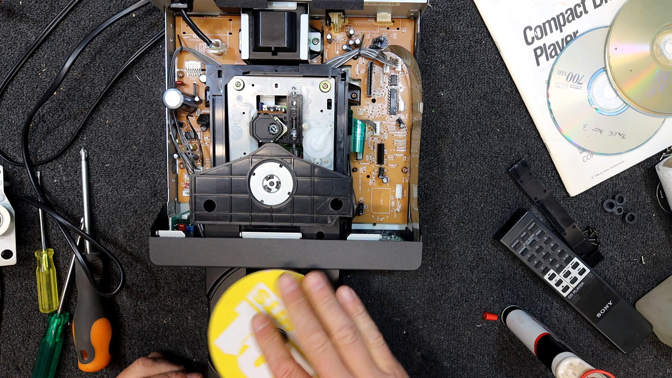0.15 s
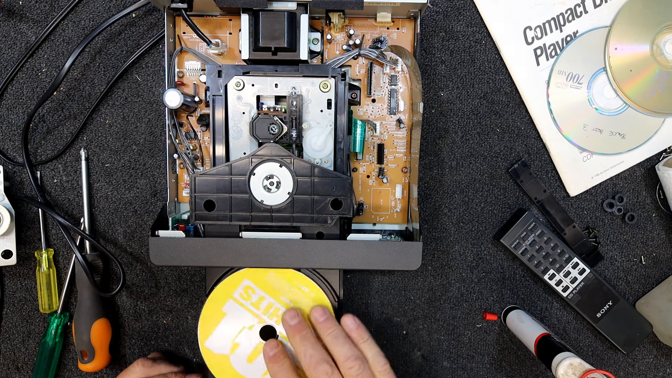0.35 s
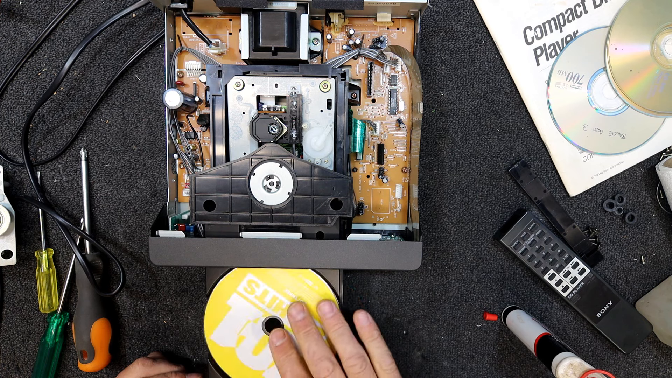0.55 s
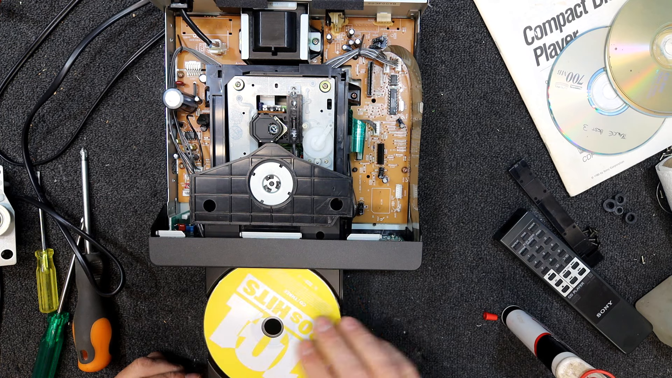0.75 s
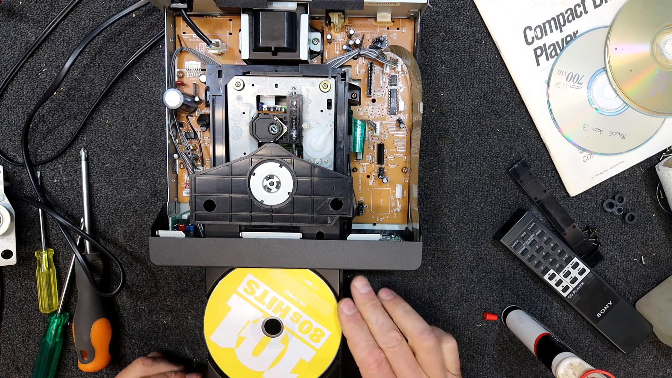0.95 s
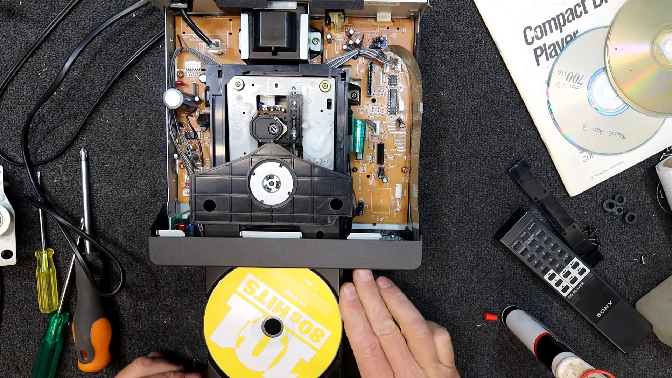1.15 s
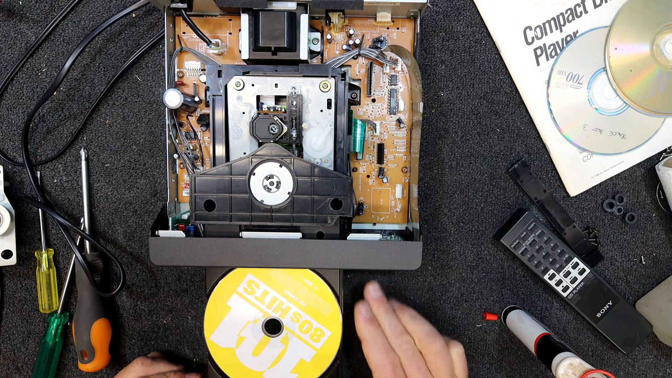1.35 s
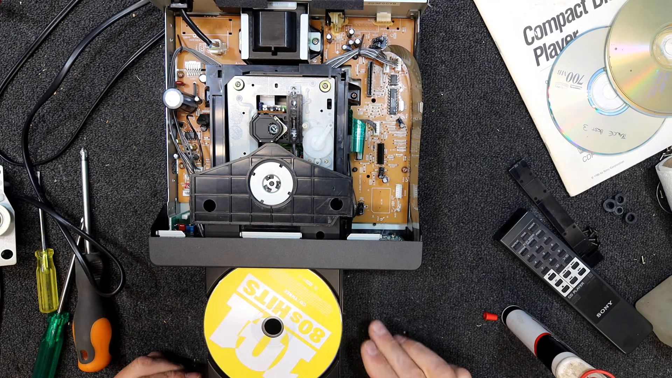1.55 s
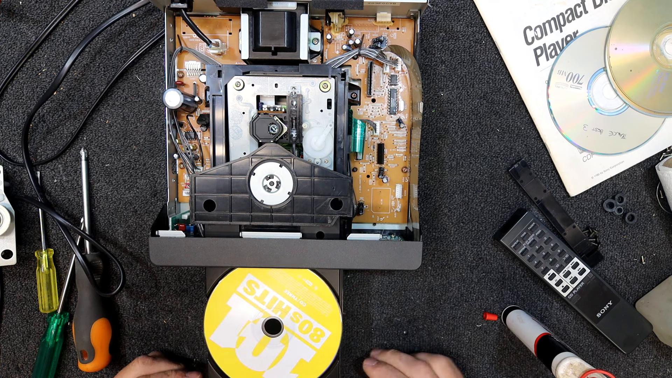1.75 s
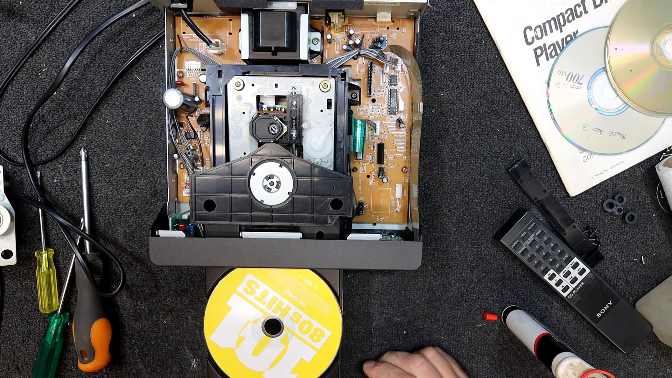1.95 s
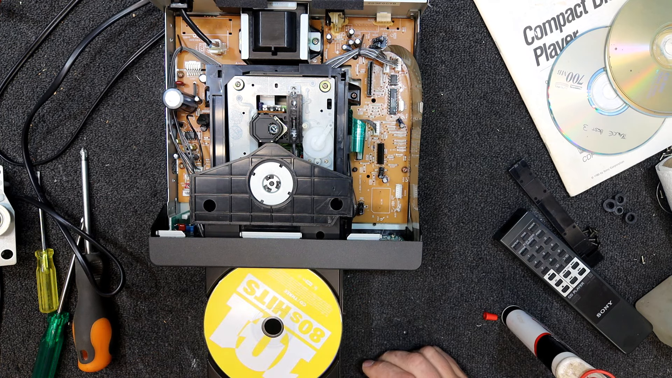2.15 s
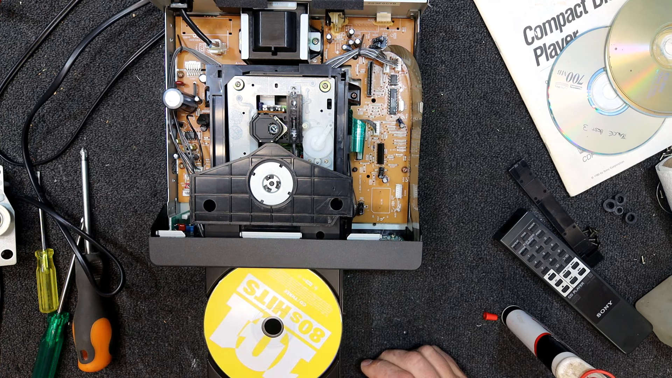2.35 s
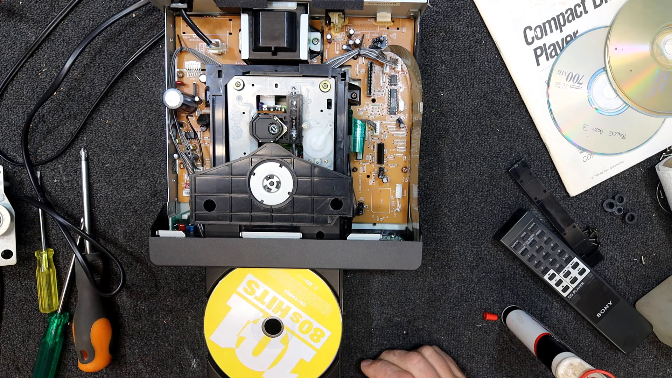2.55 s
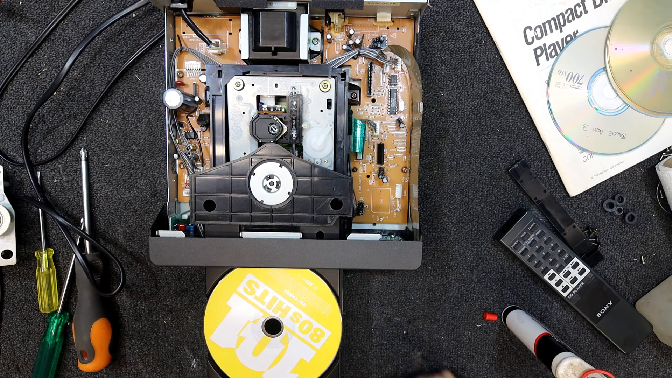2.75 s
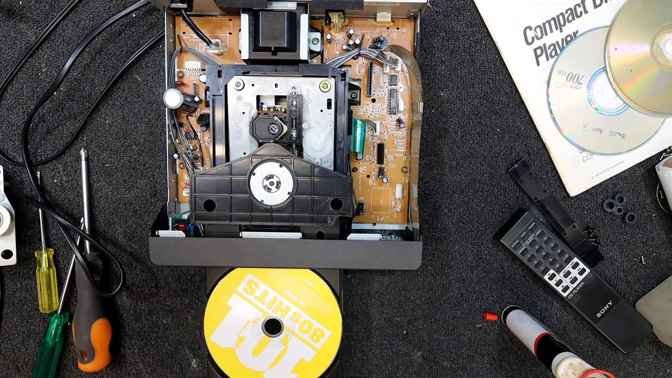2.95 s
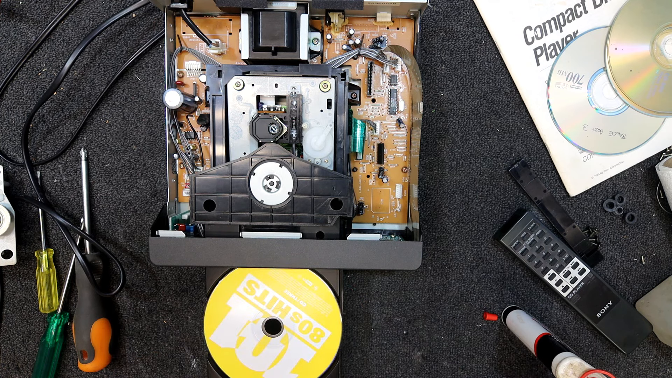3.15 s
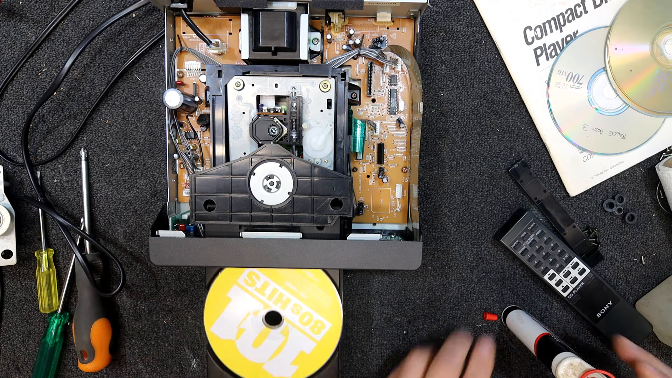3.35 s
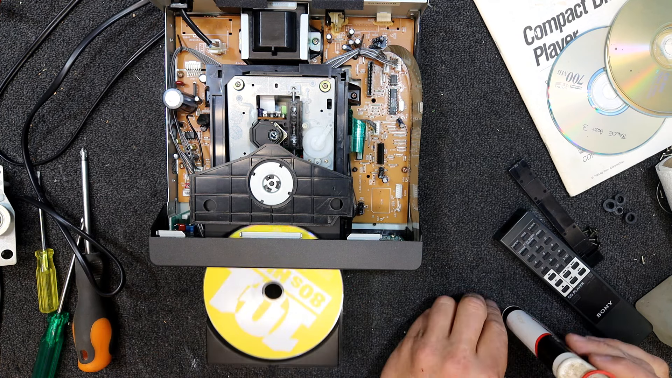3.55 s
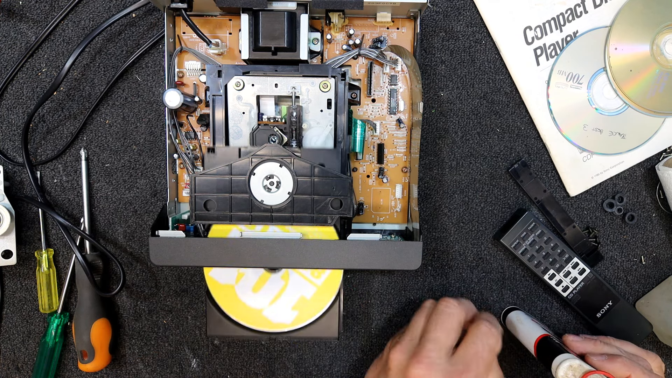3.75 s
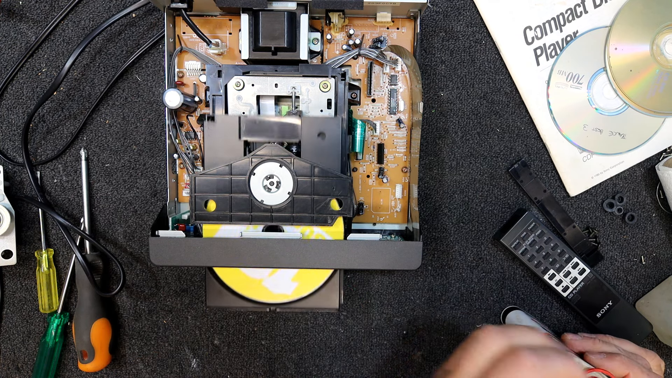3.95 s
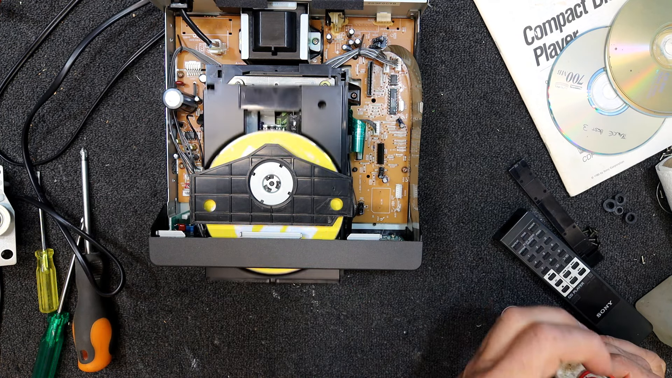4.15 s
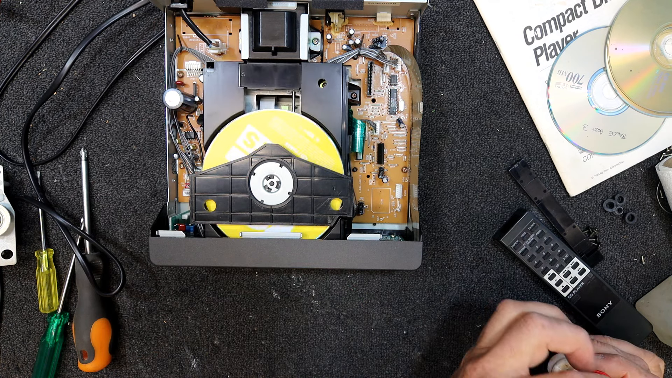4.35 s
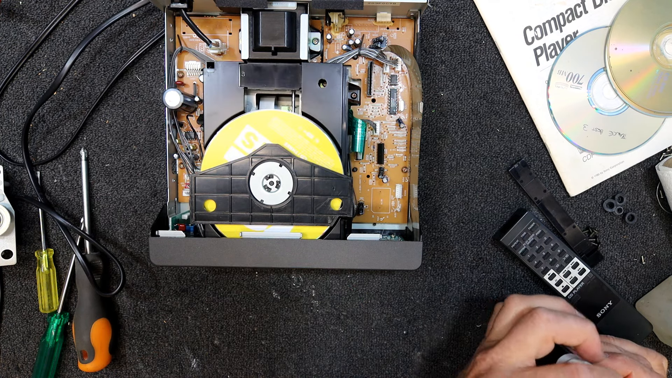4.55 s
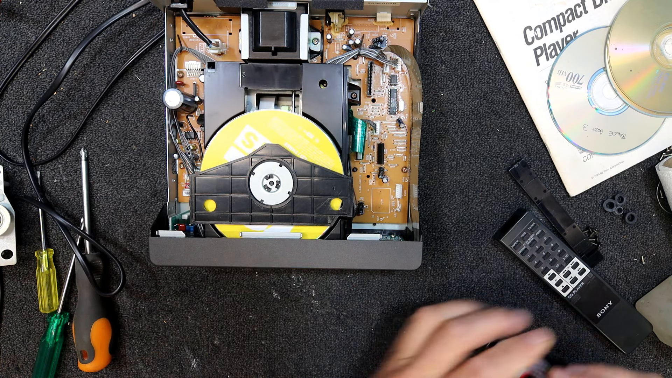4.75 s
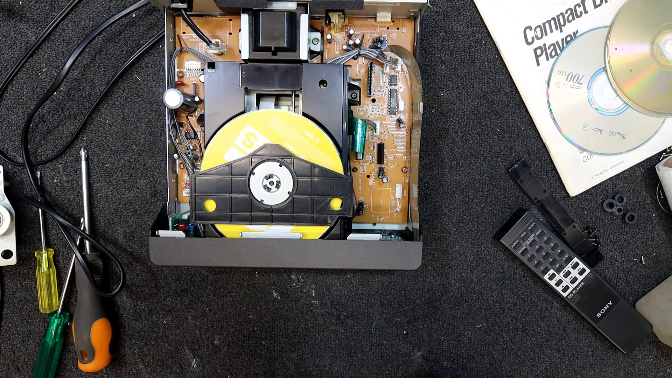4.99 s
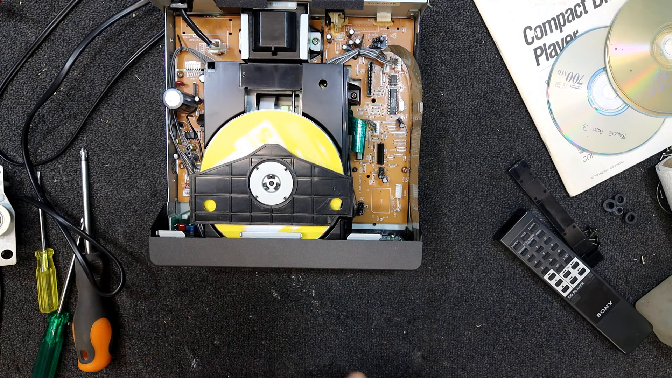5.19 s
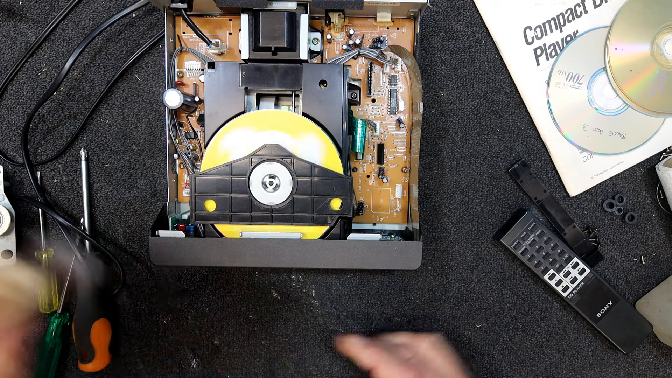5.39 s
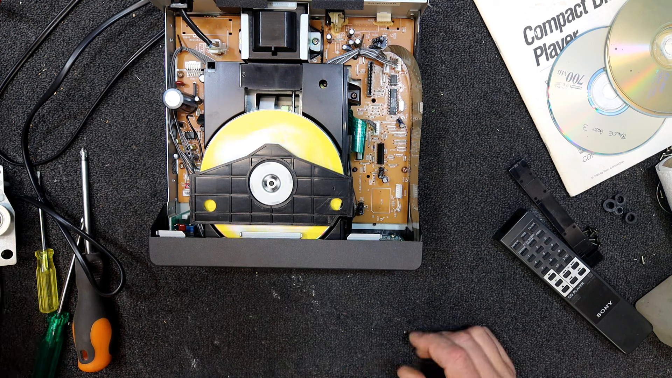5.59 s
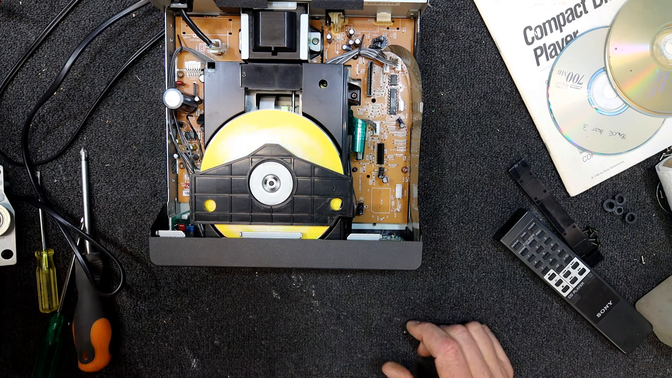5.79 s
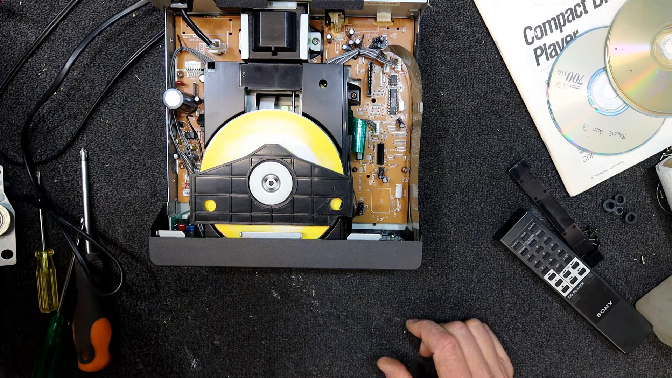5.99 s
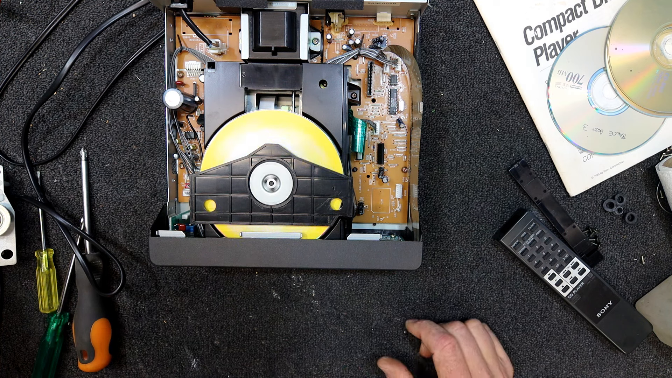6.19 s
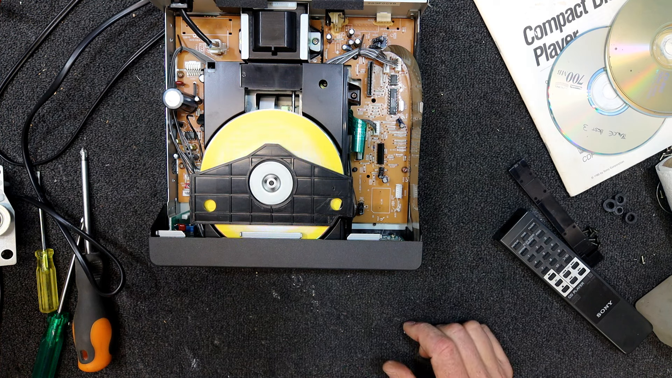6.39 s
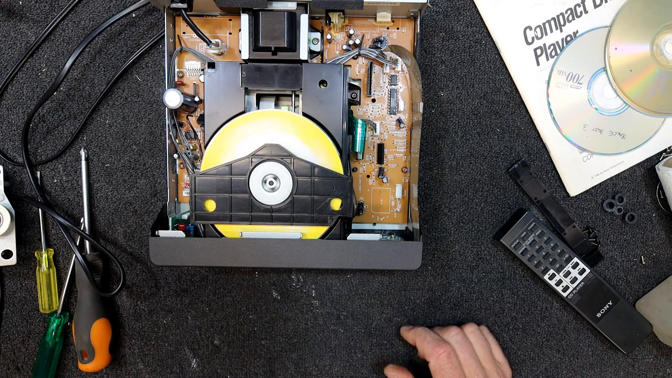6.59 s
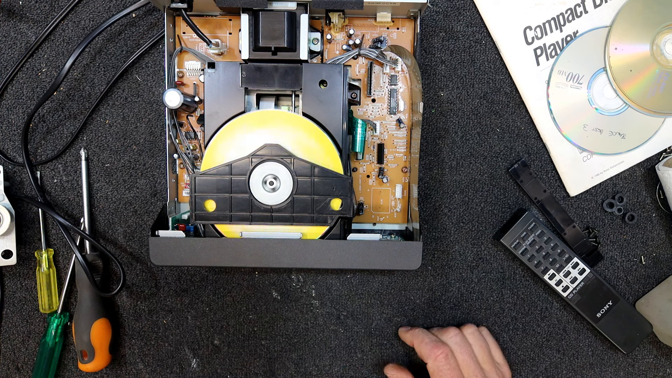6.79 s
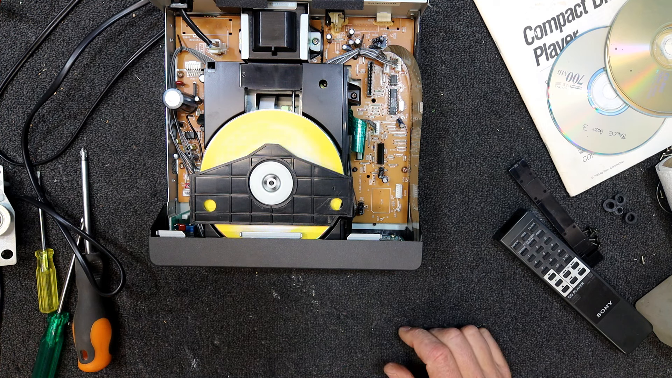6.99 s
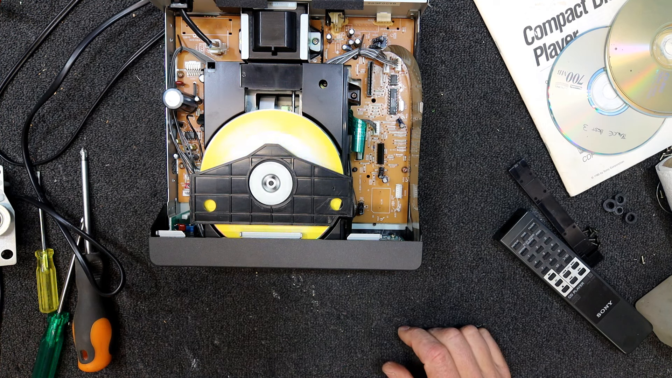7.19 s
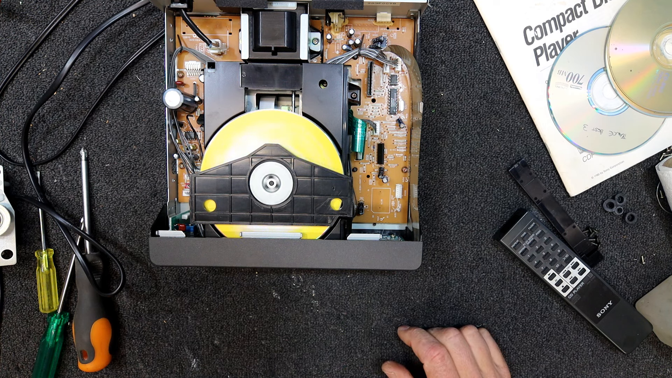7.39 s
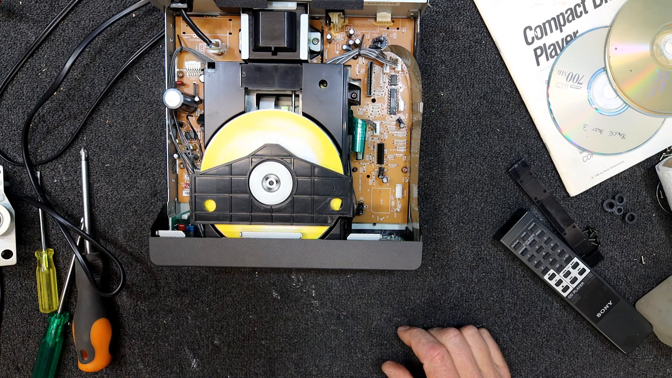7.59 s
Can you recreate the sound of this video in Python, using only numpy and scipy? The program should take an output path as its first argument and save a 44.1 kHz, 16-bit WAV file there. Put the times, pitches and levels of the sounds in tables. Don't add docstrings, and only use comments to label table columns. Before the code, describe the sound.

Over low mains hum and faint fan, a light disc rattles and scrapes on plastic, ringing briefly, and snaps home. Hands touch, slap and brush the bench. The tray motor clicks on, buzzes unevenly inward, and the clamp cracks shut with ratcheting clicks. Very quiet high squeaks and fluttering hiss come next, then one heavy, dull knock and soft ticking. Close, dry microphone above the bench.

```python
import sys
import numpy as np
from scipy import signal
from scipy.fft import rfft, irfft
from scipy.io import wavfile
from scipy.ndimage import uniform_filter1d, minimum_filter1d, map_coordinates

SR = 44100
rng = np.random.default_rng(int(sys.argv[2]) if len(sys.argv) > 2 else 0)


def gain_from_db(level_db):
    decades = np.asarray(level_db, float) / 20
    return 10 ** decades


def wav_record(signal):
    frames = np.transpose(np.atleast_2d(signal))
    bounded = np.clip(frames, -1, 1)
    quanta = np.round(bounded * 32767).astype(np.int16)
    wavfile.write(sys.argv[1], SR, quanta)


N = 336924
T = np.arange(N) / SR

# frequency in Hz, width in Hz, level in dB.
CHASSIS = [(443, 55, -3), (694, 88, 9), (1010, 140, 13.5), (1950, 93, -1), (2815, 200, 2), (3570, 61, 4.5),
           (3800, 60, -11), (5370, 280, -4), (8400, 150, -32)]
# frequency in Hz, density in dB per Hz.
CHASSIS_TONE = [(60, -35), (130, 9), (300, -1.5), (600, -10.5), (1000, -7), (1830, -10.5), (3250, -6.5),
                (6000, -16.5), (16000, -24)]
TRAY_TONE = [(120, -45), (200, -1), (519, -16.5), (722, 5), (867, -1.5), (1060, 3), (2090, -5), (2650, -2),
             (16000, -23)]
LENS_TONE = [(600, -9), (1500, -5.5), (3000, -1.5), (6000, -8), (10000, 2), (12500, -10), (14500, -17),
             (16000, -20)]


def disc():
    # start in seconds, peak in dB, low band in dB relative, high band in dB relative.
    disc_hits = [(0.2399, -18, -8, -3), (0.2678, -32.5, 8.5, -7), (0.3047, -19, -6, -0.5),
                 (0.3247, -23, -4, -12), (0.3436, -7.5, -11, -13), (0.3574, -8.5, -19, 1),
                 (0.3965, -11.5, -5, -1), (0.4194, -12.5, -17, -23), (0.4314, -10.5, 0, 5.5),
                 (0.4464, -8, -12, -12), (0.4648, -9.5, -12, -8), (0.5447, -31, 0, -19),
                 (0.5614, -36.5, 12.5, -21), (.6539, -16, -12, -3), (.6664, -7, -6.5, -3.5),
                 (0.7696, -34.5, 6, -31), (0.8225, -35, 2.5, -24), (0.8584, -52, 12.5, -18.5),
                 (1.3205, -48, -12, 9), (1.3934, -40, 13.5, -4), (1.5309, -46, 9.5, -33)]
    # frequency in Hz, width in Hz, level in dB.
    disc_modes = [(894, 26, 16.5), (1927, 46, -10.5), (2620, 240, -6.5), (3000, 37, -15.5),
                  (3265, 19, -7.5), (3710, 89, -11.5), (4450, 260, -20.5), (5160, 30, -20),
                  (6170, 180, -22.5), (6960, 56, -31), (8100, 110, -29)]
    # frequency in Hz, density in dB per Hz.
    disc_tone = [(100, -22), (400, -20), (600, -17.5), (1000, -3), (1600, -17.5), (2700, -17), (7000, -23),
                 (16000, -38)]
    # middle in seconds, half length in seconds, level in dB.
    scrapes = [
        (.28, 0.033, -39),
        (.329, 0.0041, -22),
        (.35, 0.02, -17),
        (.396, .006, -16),
        (.445, 0.052, -17.5),
        (.57, 0.029, -48),
        (.625, 0.015, -40),
        (.668, 0.018, -18.5),
        (.78, 0.02, -45),
    ]
    # start in seconds, level in dB.
    bends = [
        (.305, -28),
        (.3445, -11),
        (.36, -6.5),
        (.391, -10),
        (.424, -20),
    ]
    # start in seconds, frequency in Hz, level in dB, T60 in seconds.
    bell_tones = [(.344, 2850, -9, 0.04), (.358, 2355, -5, 0.053), (.42, 2900, -13, .04),
                  (.465, 2710, -8.5, 0.044), (.328, 980, -19, .06), (.445, 1000, -13, 0.057),
                  (.452, 1202, -21, 0.16), (.671, 1015, -12.5, 0.05), (1.276, 1040, -18, 0.038),
                  (1.531, 1530, -31, 0.034), (1.532, 2160, -38, .04), (1.532, 1850, -34, 0.032)]
    response = body(disc_tone, disc_modes[1:], lift_db=11, damping=.03)
    rattle = strikes(disc_hits, response, trim_db=0, rise=.00025, t60=.05)
    slide = strokes(scrapes) * through(grit(spread_db=3), response)
    bend_hz, bend_t60 = 894, .2
    bending = rings([(s, bend_hz, db, bend_t60) for s, db in bends])
    return rattle + slide + bending + rings(bell_tones, rough=1.5)


def snaps():
    # start in seconds, peak in dB, low band in dB relative, high band in dB relative.
    seat_hits = [
        (1.2712, -6, -24, -12),
        (1.2725, -11, -11.5, -22),
        (4.5742, -5.5, -9, -10),
    ]
    # frequency in Hz, width in Hz, level in dB.
    seat_modes = [(1040, 100, 3.5), (1870, 36, -4), (2030, 15, -16), (2260, 35, -23), (3090, 52, -11),
                  (3800, 47, -4), (4220, 42, -7), (5000, 27, -12), (5910, 40, -20), (9500, 130, -25)]
    # frequency in Hz, density in dB per Hz.
    seat_tone = [(180, -55), (300, -21), (634, -20), (1060, 0), (1430, -14), (3080, -12), (5080, -17),
                 (16000, -48.5)]
    # middle in seconds, half length in seconds, level in dB.
    rumbles = [
        (4.55, 0.014, -32.5),
        (4.6, 0.022, -28.5),
        (4.635, .012, -35),
        (4.67, .012, -40),
        (3.46, .02, -46),
    ]
    # frequency in Hz, density in dB per Hz.
    rumble_tone = [(60, -42), (130, -5.5), (200, 1), (400, -6), (700, -9), (1200, -16), (16000, -80)]
    # middle in seconds, half length in seconds, level in dB.
    holds = [
        (5.285, .012, -50),
        (5.365, .014, -57),
        (5.415, .015, -50),
        (5.465, .018, -53),
        (5.55, .035, -63),
        (5.62, .015, -68),
        (6.4, .8, -74),
    ]
    # frequency in Hz, width in Hz, level in dB.
    holder_mode = [(10270, 300, 0)]
    # start in seconds, frequency in Hz, level in dB, T60 in seconds.
    chirps = [(5.27, 3000, -39, .03), (5.325, 4430, -41, .06), (5.338, 4620, -39, .05),
              (5.352, 5600, -45, .04), (5.36, 5840, -38, .05), (5.362, 4500, -42, .05),
              (5.39, 7900, -52, .04), (5.43, 5800, -47, .04), (5.32, 3450, -46, .06)]
    seat = body(seat_tone, seat_modes, lift_db=4, damping=.05)
    clamp_body = body(CHASSIS_TONE, seat_modes, lift_db=-3, damping=.1)
    crack = strikes(seat_hits[:1], seat, trim_db=.5, rise=.00026, t60=.013)
    chatter = strikes(seat_hits[1:2], seat, trim_db=.9, rise=.00053, t60=.063)
    clamp = strikes(seat_hits[2:], clamp_body, trim_db=.1, rise=.0004, t60=.008)
    shudder_body = body(rumble_tone, CHASSIS[:1], lift_db=-10)
    shudder = strokes(rumbles) * through(grit(spread_db=2), shudder_body)
    holder = strokes(holds) * through(rng.standard_normal(N), body(LENS_TONE, holder_mode, lift_db=34))
    return crack + chatter + clamp + shudder + holder + rings(chirps, rough=2.5)


def mechanism():
    # time in seconds, level in dB.
    motor_load = [
        (3.4, -44.5),
        (3.59, -40.5),
        (3.95, -42),
        (4.3, -41.5),
        (4.6, -35.5),
        (4.76, -40),
        (4.89, -44),
        (4.96, -81),
    ]
    # frequency in Hz, width in Hz, level in dB.
    tray_modes = [(720, 45, -24), (1120, 160, -11), (1820, 75, -2), (2680, 70, -2), (3560, 54, -4),
                  (5140, 54, -16), (6230, 41, -31), (6430, 46, -32), (8060, 23, -17), (13500, 69, -20.5)]
    loader_modes = [(687, 27, 2), (1075, 140, 2), (1830, 36, -9), (3480, 210, -7), (3770, 71, -7.5),
                    (4500, 73, -9.5), (5040, 120, -6), (6860, 20, -24), (8080, 54, -9), (8660, 36, -23),
                    (9500, 240, -12), (11100, 110, -16)]
    # frequency in Hz, density in dB per Hz.
    loader_tone = [(120, -40), (200, -8), (456, -25), (529, -33), (683, -8), (867, -15), (1060, -9.5),
                   (3620, -8.5), (16000, -26.5)]
    # middle in seconds, half length in seconds, level in dB.
    latch = (4.902, 0.017, -42.5)
    # middle in seconds, half length in seconds, level in dB.
    slack = [
        (3.42, 0.0028, -35),
        (3.46, 0.021, -23.5),
        (3.5, 0.013, -28.5),
        (4.62, 0.012, -58),
        (4.675, 0.0058, -38),
        (4.92, 0.0043, -36),
    ]
    # start in seconds, peak in dB, low band in dB relative, high band in dB relative.
    gear_hits = [
        (3.4156, -31, -17, -4),
        (3.4391, -12.5, -13.5, -14),
        (4.4369, -17, -7.5, -25),
        (4.5765, -16, -13, -6),
        (4.8303, -16, -16, -16),
        (4.8511, -16, -12.5, -27),
    ]
    # start in seconds, peak in dB.
    cam_ticks = [(3.4522, -28), (3.471, -30), (3.492, -29), (4.467, -26), (4.485, -31), (4.5154, -26),
                 (4.537, -30), (4.554, -24), (4.6103, -34), (4.628, -22), (4.6629, -21.5), (4.6741, -27),
                 (4.697, -36), (4.7166, -30), (4.744, -32), (4.76, -30), (4.7849, -29), (4.811, -25.5),
                 (4.9152, -30)]
    # start in seconds, frequency in Hz, level in dB, T60 in seconds.
    clamp_tones = [(4.664, 665, -29, 0.066), (4.672, 687, -24, 0.056), (4.5745, 2810, -3.5, 0.013),
                   (4.617, 1100, -22, 0.049), (4.155, 1070, -32, 0.089), (4.18, 1040, -28.5, 0.066),
                   (4, 1080, -33, 0.065), (4.5745, 1830, -3.5, 0.013), (4.5745, 2280, -10, 0.011),
                   (4.58, 184, -16, 0.067), (4.576, 432, -13, 0.04)]
    cog_rate, cog_start, cog_db = 15.55, 3.578, -6
    loader_on_s, loader_off_s, loader_db = 4.11, 4.45, -38
    cam_low_db, cam_high_db = -8.5, -24

    turn = cog_rate * (T - cog_start) % 1
    cog_body = body(TRAY_TONE, [(1120, 190, -1), (1850, 340, -3)], lift_db=21)
    cog = through(grit(spread_db=.5) * np.exp(-turn / .091), cog_body)
    drive = through(grit(spread_db=1.5), body(TRAY_TONE, tray_modes, lift_db=1, damping=.04))
    rub = through(grit(spread_db=1.5), body(loader_tone, loader_modes, lift_db=9, damping=.015))
    loading = ramp(loader_on_s, .013)
    running = T < loader_off_s
    load = level(motor_load)
    pull = load * ((1 - loading) * drive + gain_from_db(cog_db) * cog * running)
    rub_level = gain_from_db(loader_db) * loading * running + strokes([latch])
    whirr = patchy(pull + rub_level * rub, depth_db=1.5)
    mesh = gain_from_db(1.1 * wobble(45))
    cam_level = load * ~running + strokes(slack)
    cams = cam_level * through(grit(spread_db=2.5), body(TRAY_TONE, CHASSIS, lift_db=8, damping=.04))
    hits = gear_hits + [(s, db, cam_low_db, cam_high_db) for s, db in cam_ticks]
    chassis = body(CHASSIS_TONE, CHASSIS, lift_db=8, damping=.04)
    clicks = strikes(hits, chassis, trim_db=1.75, rise=.0005, t60=.031)
    return mesh * whirr + cams + rings(clamp_tones) + clicks


def pickup():
    # frequency in Hz, width in Hz, level in dB.
    lens_modes = [(3580, 27, -0.5), (3900, 13, -32), (4560, 360, 2.5), (5800, 180, 1), (6250, 49, -7),
                  (6640, 120, -5), (8240, 29, -12), (10270, 200, 1.5)]
    # start in seconds, end in seconds, start in Hz, end in Hz, level in dB.
    sweeps = [
        (5.262, 5.298, 1480, 10760, -51),
        (5.302, 5.345, 8600, 12900, -49),
        (5.377, 5.415, 7500, 8950, -55),
        (5.405, 5.465, 9400, 12000, -52),
        (5.503, 5.589, 8330, 10630, -65),
        (5.645, 5.68, 13300, 13900, -49),
        (5.66, 5.7, 14100, 14700, -45),
        (5.76, 5.874, 9500, 11100, -79),
        (5.98, 6.05, 13500, 14500, -59),
    ]
    # middle in seconds, half length in seconds, level in dB.
    grabs = [
        (5.272, 0.0028, -42),
        (5.287, 0.01, -40.5),
        (5.33, 0.042, -47.5),
        (5.44, 0.012, -48),
    ]
    seeks = [7.2416, 7.2766, 7.3258, 7.3615, 7.3876, 7.443, 7.4681, 7.5082, 7.538, 7.583, 7.62]
    hunt_s, hunt_db, hunt_rise_s, hunt_t60 = 5.7, -47, .025, .74
    track_s, track_end_s, track_db = 6.3, 7.2, -73
    sled_s, sled_rise_s, sled_db = 7.2, .11, -52.5
    seek_db, brake_s, kick_t60 = -38, .0055, .016

    hunting = ramp(hunt_s, hunt_rise_s) * gain_from_db(hunt_db - 60 * abs(T - hunt_s) / hunt_t60)
    servo = hunting + gain_from_db(track_db) * (T > track_s) * (T < track_end_s)
    flutter_db = 4 * np.cos(2 * np.pi * 8 * T) + 2.5 * wobble(20)
    drive = servo * gain_from_db(flutter_db) * rng.standard_normal(N)
    drive += strokes(grabs) * rng.standard_normal(N)
    for s, end, start_hz, end_hz, db in sweeps:
        u = np.linspace(0, 1, round((end - s) * SR))
        hz = start_hz + (end_hz - start_hz) * u ** .85 + 330 * wobble(1500, size=len(u))
        tone = np.sin(2 * np.pi * np.cumsum(hz) / SR)
        swell = gain_from_db(db + 6 * wobble(89, size=len(u))) * abs(np.sin(np.pi * u)) ** .19
        drive[round(s * SR):][:len(u)] += swell * tone
    kick_times = [s for seek in seeks for s in (seek, seek + brake_s)]
    kicks = sum((T > s) * gain_from_db(-60 * abs(T - s) / kick_t60) for s in kick_times)
    drive += gain_from_db(seek_db) * kicks * np.sign(rng.standard_normal(N))
    response = body(LENS_TONE, lens_modes, lift_db=16.5, damping=.008)
    lens = signal.fftconvolve(drive, response / np.linalg.norm(response))[:N]

    motor_body = body(TRAY_TONE, [(688, 100, -2), (1310, 220, -11.5)], lift_db=19)
    sled = gain_from_db(sled_db) * ramp(sled_s, sled_rise_s) * through(rng.standard_normal(N), motor_body)
    sway = ramp(5.8, .4) * gain_from_db(-69.5 + 6 * np.cos(2 * np.pi * 8.1 * (T - 6.25)))
    swaying = sway * through(rng.standard_normal(N), body(LENS_TONE, [(4510, 230, 0)], lift_db=33))
    return lens + sled + swaying


def hands():
    # start in seconds, peak in dB, low band in dB relative, high band in dB relative.
    bench_hits = [
        (1.9584, -39, -3, -22),
        (1.9896, -30, -17, -29),
        (2.4857, -43.5, 11.5, -18),
        (2.5338, -47.5, 14, -14),
        (2.5888, -3, -8, -7),
        (2.7392, -42, 14, -21),
        (2.779, -64, 9, -20),
        (3.2618, -30.5, -16, -10),
    ]
    knocks = [
        (6.0546, -14, 9, -9),
        (6.0725, -27, 14.7, -24),
    ]
    # frequency in Hz, width in Hz, level in dB.
    bench_modes = [(640, 90, 7.5), (1237, 21, 10.5), (2550, 440, -8), (3560, 43, 2), (3800, 7, -3),
                   (4130, 50, -43), (5100, 14, -14), (6060, 30, -21), (9080, 42, -9), (10030, 60, -6.5)]
    table_modes = [(420, 70, -3), (590, 60, -20), (770, 50, 2), (1060, 54, 2), (1325, 98, -2.5),
                   (2130, 190, -8.5), (3220, 210, -16)]
    # frequency in Hz, density in dB per Hz.
    bench_tone = [(100, -6.5), (250, -4), (400, -13.5), (600, 1.5), (1000, -1.5), (1800, -11.5),
                  (3600, -13), (9000, -14.5), (16000, -19)]
    table_tone = [(60, -70), (130, -35), (250, -12), (400, -4), (1000, -5), (1600, -19), (2300, -17),
                  (4000, -25.5), (16000, -63.5)]
    skin_tone = [(300, -3), (1000, -4), (3000, -4.5), (6000, -10), (10000, -23.5), (16000, -20.5)]
    # middle in seconds, half length in seconds, level in dB.
    rubs = [(1.258, 0.0093, -49), (1.401, 0.0076, -36), (1.42, .015, -51), (1.525, .01, -54),
            (2.015, 0.076, -60), (2.82, 0.0098, -51), (3.18, 0.049, -48), (3.26, 0.034, -52),
            (3.69, 0.041, -41), (5.08, 0.0075, -50.5), (5.69, 0.021, -47), (5.715, 0.009, -41.5),
            (6.52, 0.017, -58), (6.8, 0.017, -66), (7.06, 0.029, -55.5)]
    stirs = [
        (0, 0.18, -47),
        (1.25, 0.11, -56),
        (2.75, 0.69, -55.5),
        (3.33, 0.063, -45.5),
        (5.93, 0.28, -49),
        (6.8, 0.43, -57.5),
    ]
    # start in seconds, frequency in Hz, level in dB, T60 in seconds.
    tocks = [(2.589, 1150, -10, 0.057), (2.59, 620, -18.5, 0.05), (2.59, 240, -25.5, 0.1),
             (2.741, 650, -22.5, 0.057), (2.742, 720, -29, 0.047), (2.589, 2550, -10.5, 0.027),
             (5.669, 325, -25, 0.037), (5.67, 540, -35, 0.083), (6.055, 837, -1, 0.046),
             (6.072, 404, -12, 0.09), (6.12, 560, -35, 0.57), (6.105, 402, -33, .15),
             (6.056, 1320, -12, 0.054), (6.056, 1750, -22, .04), (6.07, 169, -27, 0.4)]
    thump = [
        (6.0545, 375, 1, .05),
        (6.056, 250, -9, .05),
        (6.056, 580, -11, .04),
        (6.056, 1080, -10, .05),
    ]
    spin_s, spin_db = 4.95, -56

    bench = body(bench_tone, bench_modes, lift_db=5, damping=.022)
    taps = strikes(bench_hits, bench, trim_db=-3, rise=.00016, t60=.13)
    table = body(table_tone, table_modes, lift_db=4, damping=.06)
    blows = strikes(knocks, table, trim_db=3, rise=.001, t60=.097)
    brushing = strokes(rubs) + gain_from_db(-5.5) * (strokes(stirs) + gain_from_db(spin_db) * (T > spin_s))
    skin = through(grit(spread_db=.6), body(skin_tone, bench_modes, lift_db=1, damping=.1))
    tones = rings(tocks, rough=2.4) + rings(thump, rough=.3)
    high_pass = signal.butter(2, 140, "high", fs=SR, output="sos")
    return taps + blows + signal.sosfilt(high_pass, tones) + brushing * skin


def details():
    # start in seconds, frequency in Hz, level in dB, T60 in seconds.
    glints = [(4.5745, 3970, -8.5, 0.013), (4.5745, 5200, -15, 0.0088), (4.564, 3500, -29, .05),
              (4.564, 5700, -32, .02), (4.554, 6000, -32, .02), (1.2713, 3670, -15, 0.028),
              (1.2713, 4380, -10.5, .02), (1.2713, 5000, -12.5, .02), (4.8305, 3640, -16.5, 0.032),
              (4.8305, 2840, -18, .03), (4.8515, 2870, -18, .03), (4.437, 2850, -20, .02),
              (2.5895, 3500, -17, .08), (2.589, 1700, -13, .03), (2.742, 1020, -30, .03),
              (6.075, 1900, -30, 0.11), (6.085, 2550, -30, 0.12), (6.056, 3250, -32, .08),
              (6.167, 1700, -45, .04), (6.167, 3600, -44, .04), (7.05, 3200, -48, .1),
              (.16, 3000, -48, .04), (5.705, 3300, -37, .06), (5.29, 6300, -46, .05),
              (.24, 993, -25.5, 0.0496), (.215, 3600, -49, 0.055), (4.916, 1200, -29, .03),
              (4.538, 1900, -28, .04)]
    bumps = [(.27, 200, -38, .1), (.53, 200, -38, .1), (.69, 190, -32.5, .12), (.96, 640, -43, .08),
             (1.15, 450, -43, 0.073), (1.28, 220, -36.5, 0.094), (1.53, 240, -38, 0.096),
             (1.99, 600, -43, .08), (2.745, 290, -33, .08), (6.055, 190, -10.5, .06),
             (6.155, 125, -32, .15), (6.168, 804, -36, .08), (6.765, 300, -41, 0.074),
             (6.91, 310, -44, .08), (5.67, 220, -36.5, .06), (.348, 450, -28.5, .1), (.475, 740, -29, .12),
             (.49, 993, -28, .1), (.555, 996, -32, 0.11), (6.17, 390, -35, 0.37), (5.26, 1054, -38.5, .08)]
    return rings(glints, rough=1.2) + rings(bumps, rough=.8)


def background():
    # multiple of the mains frequency, level in dB rms.
    harmonics = [(1, -37.5), (2, -59.5), (3, -54.5), (5, -65), (7, -92), (9, -62.5)]
    # frequency in Hz, width in Hz, level in dB rms.
    fan_tones = [(116, 1.43, -55.5), (965, 4.6, -62), (931, 5.3, -64)]
    # frequency in Hz, density in dB per Hz.
    air_tone = [(45, -61), (70, -20), (130, -20), (200, -28), (450, -33), (800, -33.5), (1100, -35.5),
                (1500, -40.5), (4000, -45), (12700, -52), (15400, -56.5), (16500, -52)]
    mains_hz = 50.004
    mains_phase = 2 * np.pi * mains_hz * T - 1.22
    out = np.zeros(N)
    for k, db in harmonics:
        out += gain_from_db(db + .3 * wobble(4)) * np.sqrt(2) * np.cos(k * mains_phase)
    for hz, width, db in fan_tones:
        phase = 2 * np.pi * np.cumsum(hz + width * wobble(width) / 2) / SR
        out += gain_from_db(db + 2.5 * wobble(width)) * np.sqrt(2) * np.sin(phase)
    air = through(rng.standard_normal(N), body(air_tone, [(1070, 130, -10)], lift_db=-3.5))
    return out + gain_from_db(-50 + .7 * wobble(6)) * air


def room(x):
    # frequency in Hz, T60 in seconds.
    decay_times = [(150, 0.5), (500, 0.25), (2000, 0.13), (8000, 0.12), (16000, 0.18)]
    hz, t, z = signal.stft(rng.standard_normal(SR // 2), SR, nperseg=256)
    reach = .08 * (1 + 1000 / (hz[:, None] + 100))
    decay_db = -60 * t / along(decay_times, hz)[:, None] - 4.2 * (t / reach) ** 4
    tail = signal.istft(z * gain_from_db(decay_db), SR, nperseg=256)[1]
    delayed = np.pad(x, (150, 0))
    return signal.fftconvolve(delayed, tail / np.linalg.norm(tail))[:N]


def strikes(hits, response, trim_db, rise, t60):
    out, t = np.zeros(N + SR), np.arange(SR // 4) / SR
    snap = 1 + 1.3 * np.exp(-t / rise / 2)
    shape = gain_from_db(-60 * t / t60) * (1 - np.exp(-t / rise)) * snap
    jolts = rng.standard_normal((len(hits), len(t))) * shape
    ring = signal.fftconvolve(jolts, response[None], axes=1)[:, :len(t)]
    bands = []
    for edge, kind in [(1500, "low"), ((1500, 6000), "band"), (6000, "high")]:
        part = signal.sosfilt(signal.butter(2, edge, kind, fs=SR, output="sos"), ring)
        bands.append(part / abs(part).max(axis=1, keepdims=True))
    low, mid, high = bands
    for k, (s, db, low_db, high_db) in enumerate(hits):
        blow = gain_from_db(low_db) * low[k] - mid[k] + gain_from_db(high_db) * high[k]
        out[round(s * SR):][:len(t)] += gain_from_db(db + trim_db) * blow
    return out[:N]


def rings(rows, rough=.22):
    out, t = np.zeros(N + SR), T[:SR // 2]
    for s, hz, db, t60 in rows:
        phase = 2 * np.pi * hz * t + rough * wobble(70, size=len(t))
        envelope = gain_from_db(db - 60 * t / t60) * (1 - np.exp(-t * hz * 4))
        out[round(s * SR):][:len(t)] += envelope * np.sin(phase)
    return out[:N]


def strokes(rows):
    return sum(gain_from_db(db) * np.exp(-((T - s) / half) ** 2) for s, half, db in rows)


def body(tone, peaks, lift_db, damping=0, size=8192):
    hz = np.fft.rfftfreq(size, 1 / SR)
    bumps = 0
    for centre, width, db in peaks:
        detuning = (hz - centre) / (width + damping * centre)
        bumps = bumps + gain_from_db(db - along(tone, centre)) / (1 + 4 * detuning ** 2)
    gain = gain_from_db(along(tone, hz)) * (1 + gain_from_db(lift_db) * bumps / bumps.max())
    ceps = irfft(np.log(gain + 1e-6))
    ceps[1:size // 2] *= 2
    ceps[size // 2 + 1:] = 0
    return irfft(np.exp(rfft(ceps)))


def through(x, response):
    return unit(signal.fftconvolve(x, response)[:len(x)])


def grit(spread_db):
    return rng.standard_normal(N) * gain_from_db(spread_db * wobble(400))


def patchy(x, depth_db):
    z = signal.stft(x, nperseg=256)[2]
    field = uniform_filter1d(rng.standard_normal(z.shape), size=4, axis=0)
    field = uniform_filter1d(field, size=12, axis=1)
    return signal.istft(z * gain_from_db(depth_db * unit(field)), nperseg=256)[1][:N]


def wobble(rate, size=N):
    return map_coordinates(rng.standard_normal(int(size * rate / SR) + 4), [T[:size] * rate])


def level(rows):
    return gain_from_db(np.interp(T, *np.transpose(rows), left=-150, right=-150))


def ramp(s, rise):
    return np.clip((T - s) / rise, 0, 1)


def along(points, hz):
    f, v = np.transpose(points)
    return np.interp(np.log(hz + 1), np.log(f + 1), v)


def unit(x):
    return x / np.sqrt(np.mean(x ** 2) + 1e-20)


def scene():
    near = disc() + snaps() + mechanism() + pickup() + hands() + details()
    return (near + gain_from_db(-10) * room(near) + background())[None]


def roll_off(x):
    return signal.sosfilt(signal.butter(12, 16670, fs=SR, output="sos"), x)


def record(dry):
    threshold_db, strength, deepest_db = -3, 2.8, 6
    recovery_s, fade_s = .11, .02
    over_db = np.maximum(20 * np.log10(abs(dry[0]) + 1e-6) - threshold_db, 0)
    over_db = -minimum_filter1d(-over_db, size=1765, origin=882)
    keep = np.exp(-1 / (recovery_s * SR))
    duck_db = strength * signal.lfilter([1 - keep], [1, -keep], over_db)
    fade = np.clip((T[-1] - T) / fade_s, 0, 1)
    x = np.clip(dry * gain_from_db(-np.clip(duck_db, 0, deepest_db)) * fade, -1, 1)
    x = signal.sosfilt(signal.butter(10, 15700, fs=SR, output="sos"), x)
    return roll_off(x)


dry = scene()
out = record(dry)
wav_record(out)
```